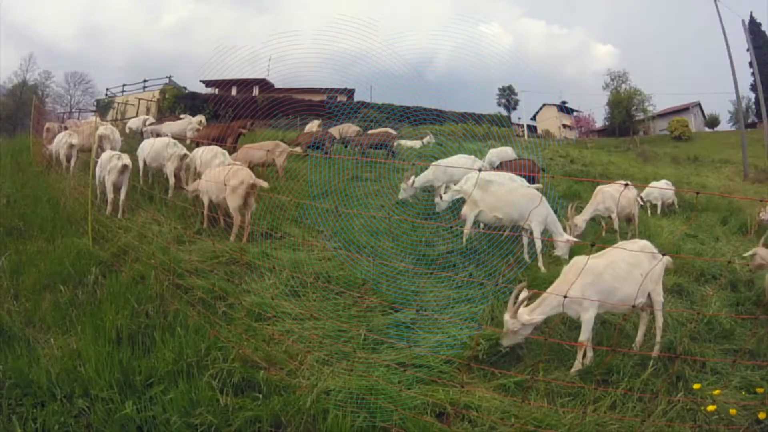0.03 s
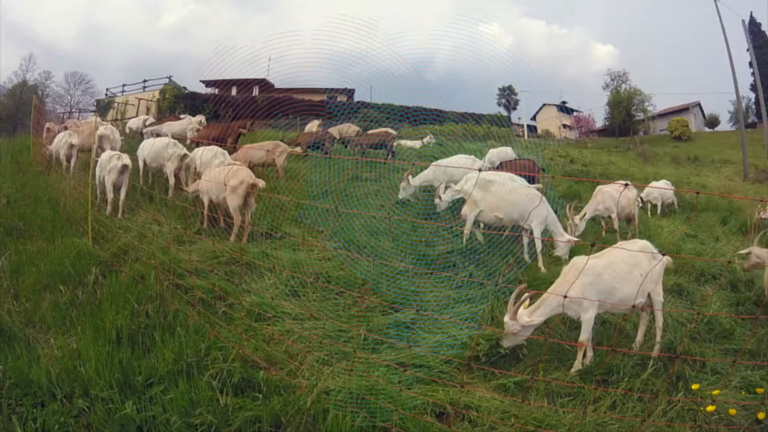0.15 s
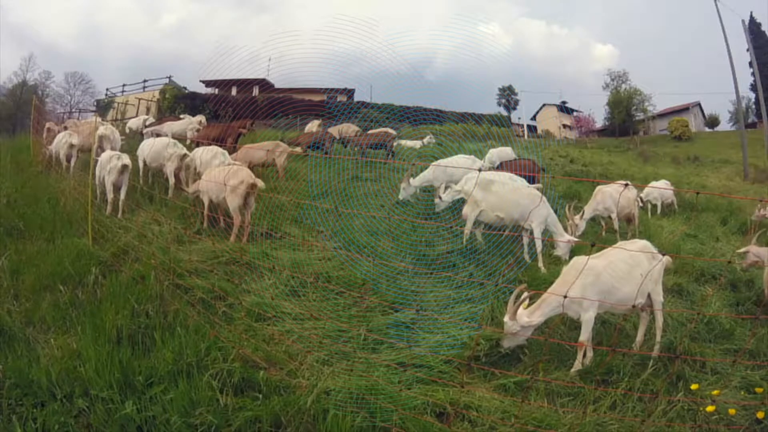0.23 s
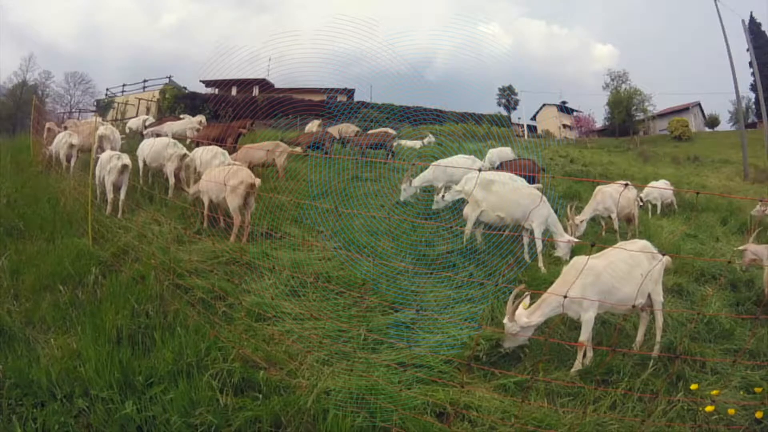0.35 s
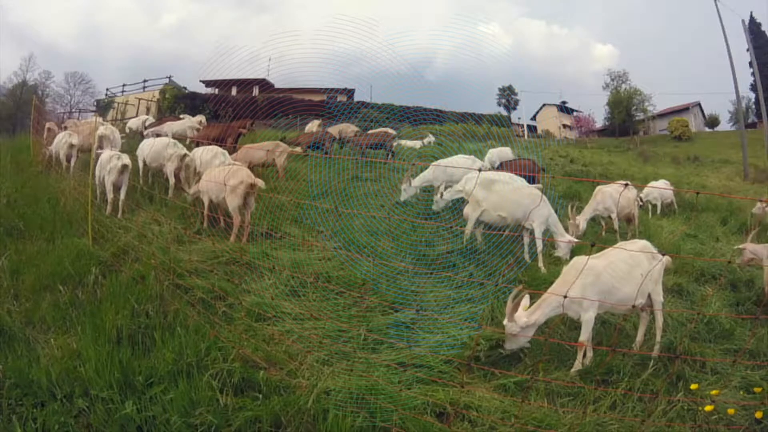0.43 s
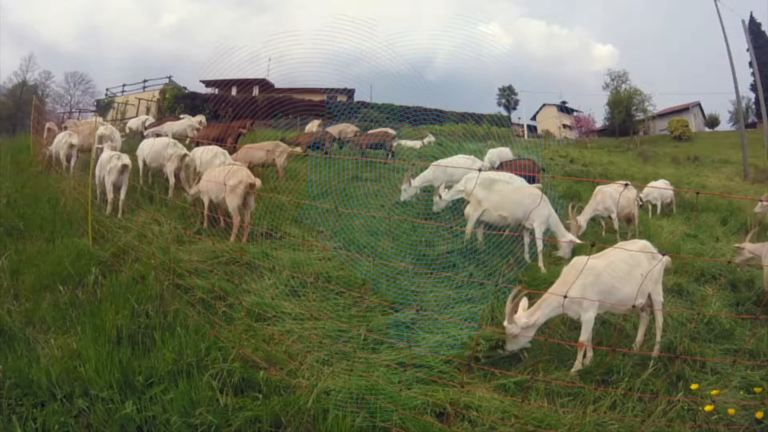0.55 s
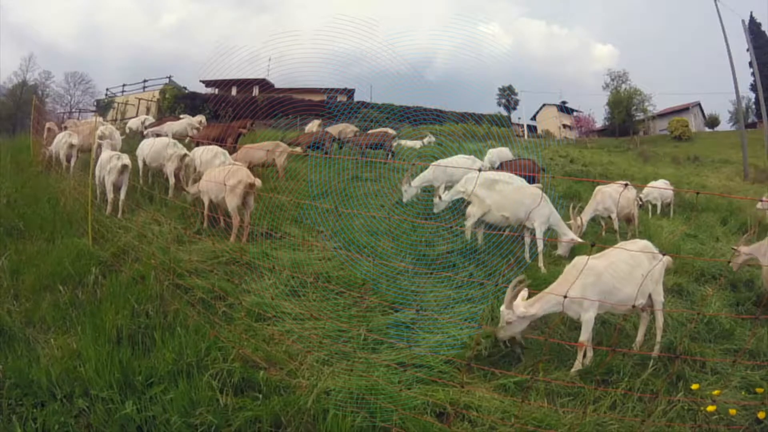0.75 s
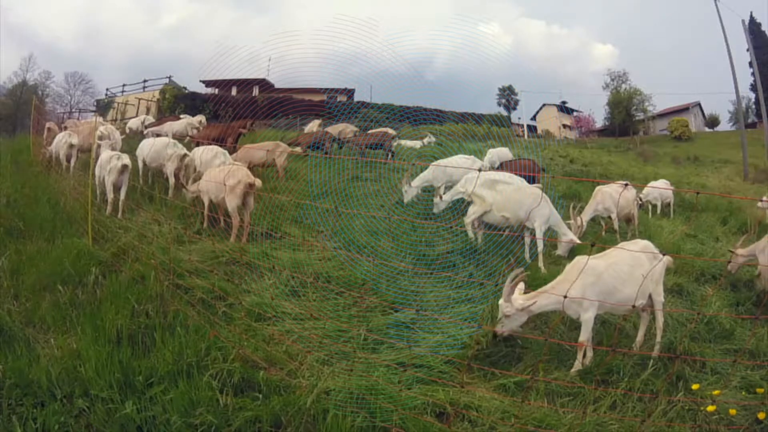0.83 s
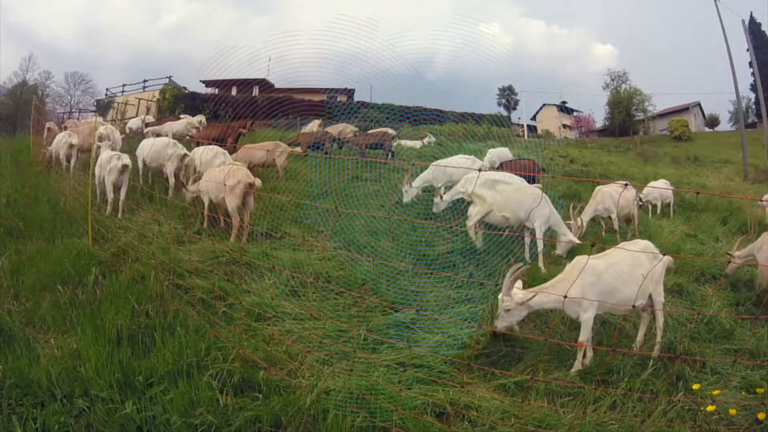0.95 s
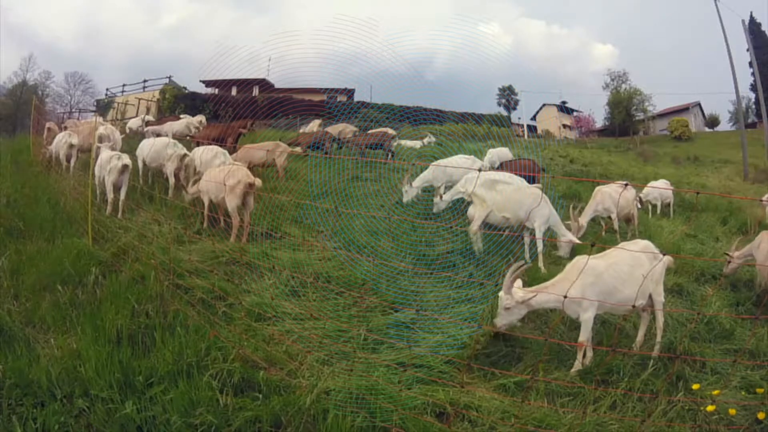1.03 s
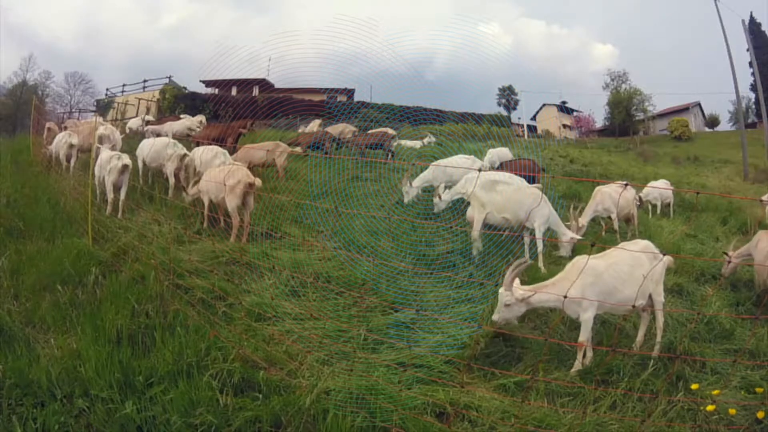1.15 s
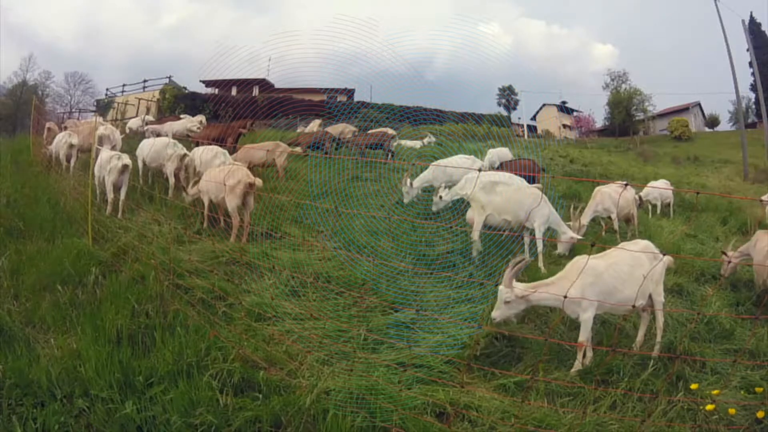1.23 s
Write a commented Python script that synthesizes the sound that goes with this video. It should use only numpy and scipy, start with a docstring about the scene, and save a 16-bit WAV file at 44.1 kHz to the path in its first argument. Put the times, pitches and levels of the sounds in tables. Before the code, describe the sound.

Goat bells clank on an open hillside. Two distant bells ring at the start, left and right. A close sheet-metal bell on the right strikes at about 0.2, 0.4, 0.5, 0.9 and 1.2 seconds, ending with a small clink, while a deeper bell clanks ahead. Hooves thud softly near 0.3 and 0.9 seconds. Faint grass tearing comes and goes over a light rumbling breeze.

```python
"""Goats graze on an open hillside, heard in stereo from within the herd. A light breeze rumbles throughout.
First two far bells clank, a small one on the right and a faint one on the left; grass is torn and a deeper
bell joins from ahead. Then a sheet-metal bell close on the right is struck five times by its clapper,
ringing with its wall modes and a short hollow note of the air inside. Hooves thud softly between the
blows, and after the last one the clapper rebounds with a small clink."""
import sys
import numpy as np
from scipy import signal
from scipy.fft import rfft, irfft
from scipy.io import wavfile

SR = 44100
rng = np.random.default_rng(int(sys.argv[2]) if len(sys.argv) > 2 else 0)


def wav_out(sig):
    """Save sig, one row per channel (or a flat mono array), as 16-bit PCM at SR to the path in sys.argv[1]."""
    wavfile.write(sys.argv[1], SR, np.round(np.clip(np.atleast_2d(sig).T, -1, 1) * 32767).astype(np.int16))


N = 57330
NEAR_LAG_S, AHEAD_LAG_S = 0.00063, -0.000079   # arrival at the left microphone after the right
ATTACK_S, AIR_ATTACK_S = 0.00018, 0.0026   # rise of the metal's ring and of the air note

# Spectrum of a clapper's clack on sheet metal. Each row: frequency in Hz, relative level in dB.
CLACK_SPECTRUM = [(700, -36), (1500, 6), (2900, 3), (4600, 9), (5800, -5.5), (7000, 10.5), (9000, -7.5),
                  (12000, -2), (16000, -19)]


def from_db(db):
    """Decibels to gain."""
    return 10 ** (np.asarray(db) / 20)


def unit_rms(x):
    """Scale to an rms of 1."""
    return x / np.sqrt(np.mean(x ** 2) + 1e-20)


def per_bin(points):
    """Read rows of frequency in Hz and value at every frequency bin."""
    hz, value = np.transpose(points)
    return np.interp(np.log(np.arange(N // 2 + 1) * SR / N + 1), np.log(hz), value)


def coloured(x, spectrum):
    """Shape a signal by a spectrum in dB; rms 1."""
    return unit_rms(irfft(rfft(x) * from_db(per_bin(spectrum)), N))


def butter(x, hz, kind, order=2):
    """Butterworth low- or high-pass."""
    return signal.sosfilt(signal.butter(order, hz, kind, fs=SR, output="sos"), x)


def mic_times(lag_s=0):
    """Time at the left and right microphone; the sound reaches the left lag_s later."""
    return np.arange(N) / SR - np.array([[lag_s], [0]])


def pan(db):
    """Gains that put the left channel db above the right."""
    return from_db([[db], [0]])


def ring_down(t, starts, levels_db, t60, attack_s=ATTACK_S):
    """Envelope of a vibration whose energy is topped up by each strike and then dies away."""
    energy = 0
    for start, db in zip(starts, levels_db):
        age = np.maximum(t - start, 0)
        rise = np.minimum(age / attack_s, 1)
        energy += (from_db(db) * rise * np.exp(-np.log(1000) * age / t60)) ** 2
    return np.sqrt(energy)


def mode(t, hz, starts, levels_db, t60, pan_db, attack_s=ATTACK_S):
    """One struck mode at both microphones."""
    envelope = ring_down(t, starts, levels_db, t60, attack_s)
    return pan(pan_db) * envelope * np.sin(2 * np.pi * (hz * t + rng.random()))


def contact_db(hz, cutoff_hz):
    """A soft contact loses the modes above its cut-off."""
    return -10 * np.log10(1 + (hz / cutoff_hz) ** 8)


def weak_modes(mean_spacing_hz=80):
    """The many faint partials of sheet metal, scattered in pitch, unequal at the two microphones."""
    present = rng.random(N // 2 + 1) < SR / N / mean_spacing_hz
    return coloured(irfft(present * rfft(rng.standard_normal((2, N))), N), CLACK_SPECTRUM)


def breeze(split_hz=420):
    """A low gusting rumble, much alike at both microphones, under a wide faint hiss."""
    # Open air. Each row: frequency in Hz, relative level in dB.
    spectrum = [(35, 1), (70, -2.5), (150, -7), (250, -18.5), (500, -23.5), (1200, -19.5), (3000, -18.5),
                (4600, -17), (8500, -28.5), (12400, -25), (16000, -24.5)]
    # Each row: frequency in Hz, left-right correlation.
    likeness = [(120, 0.92), (300, 0.52), (800, 0.031), (4000, 0.016)]
    # Each row: time in seconds, relative level of the rumble in dB.
    gusts = [(0.0, -69), (0.136, -63), (.2, -62.5), (0.26, -69.5), (0.34, -65), (0.44, -69), (0.6, -60.5),
             (0.66, -69), (0.92, -66), (1.1, -66), (1.22, -70.5)]
    mid, side = rfft(rng.standard_normal((2, N)))
    alike = np.clip(per_bin(likeness), 0, 1)
    noise = irfft(np.sqrt(1 + alike) * mid + np.sqrt(1 - alike) * side * [[1], [-1]], N)
    air = coloured(noise, spectrum)
    swell = from_db(4 + np.interp(mic_times(), *np.transpose(gusts)))
    rumble = swell * pan(2.5) * butter(air, split_hz, "low")
    hiss = from_db(-58) * pan(-2) * butter(air, split_hz, "high")
    return rumble - hiss


def far_bell(modes, strikes, lag_s, air_t60, air_pan_db):
    """A distant bell rings and clacks; its air note shifts as its mouth swings near the goat's neck."""
    t = mic_times(lag_s)
    starts, wall_db, cutoff_hz, air_db, air_hz = np.transpose(strikes)
    ring = sum(mode(t, hz, starts, wall_db + db + contact_db(hz, cutoff_hz), t60, pan_db)
               for hz, db, t60, pan_db in modes)
    hollow = sum(mode(t, hz, [start], [db], air_t60, air_pan_db, AIR_ATTACK_S)
                 for start, db, hz in zip(starts, air_db, air_hz))
    clack_hz = np.mean(CLACK_SPECTRUM, axis=0)[0]
    clack_db = wall_db - 60 + contact_db(clack_hz, cutoff_hz)
    return ring + hollow + pan(4) * weak_modes() * ring_down(t, starts, clack_db, t60=0.22)


def small_bell():
    """Far off on the right, two hard blows ring a small bell."""
    # Each row: wall mode in Hz, level in dB, t60 in seconds, pan in dB.
    modes = [(2678, -51.5, 0.49, -23), (4970, -58, 0.89, -9), (5010, -43, 0.39, -21),
             (7617, -54.5, 0.32, -14), (8070, -60.5, 0.45, -6), (10830, -53.5, 0.38, -16)]
    # Each row: start in seconds, strength in dB, contact cut-off in Hz, air note in dB and in Hz.
    strikes = [(.001, -1, 18300, -62, 1030), (0.364, -7.5, 16100, -64, 1030)]
    return far_bell(modes, strikes, lag_s=0.000242, air_t60=0.13, air_pan_db=-2)


def left_bell():
    """Far off on the left, two soft blows ring a faint bell."""
    # Its one row: wall mode in Hz, level in dB, t60 in seconds, pan in dB.
    modes = [(2627, -60.5, 0.31, 11)]
    # Each row: start in seconds, strength in dB, contact cut-off in Hz, air note in dB and in Hz.
    strikes = [(.001, 2, 3950, -61, 1113), (0.491, -7.5, 3000, -64, 1122)]
    return far_bell(modes, strikes, AHEAD_LAG_S, air_t60=0.5, air_pan_db=3.8)


def hillside_echoes(bells):
    """The slope scatters a little of the bells' sound back to the microphones."""
    scatter = rng.standard_normal((2, N)) * ring_down(mic_times(), [0.0075], [0], t60=0.93)
    return from_db(-22) * signal.fftconvolve(bells[1:], unit_rms(scatter) / np.sqrt(N), axes=1)[:, :N]


def torn_grass(snaps_per_s=4800, spread_db=5):
    """To the right, each pull of a muzzle is a short swell of tiny snapping blades."""
    # Each row: peak time in seconds, length in seconds, level in dB.
    tears = [(.13, .05, -62), (.178, .025, -62), (.352, .025, -62), (.712, .022, -61), (1.12, .018, -64),
             (1.165, .04, -64)]
    # Snapping blades. Each row: frequency in Hz, relative level in dB.
    spectrum = [(1000, -13), (2500, -21), (4500, -2), (9000, -3), (12500, 0), (16000, -10)]
    snapping = rng.random(N) < snaps_per_s / SR
    strength = from_db(spread_db * rng.standard_normal(N).clip(-2, 2))
    snaps = snapping * strength * rng.standard_normal((2, N))
    pull = sum(from_db(db) * np.exp(-2 * ((mic_times() - at) / length) ** 2) for at, length, db in tears)
    return pan(-5.5) * pull * coloured(snaps, spectrum)


def deep_bell():
    """Some way ahead, a deeper bell takes a mix of hard and soft blows."""
    # Each row: wall mode in Hz, level in dB, t60 in seconds, pan in dB.
    modes = [(2174, -70, 0.71, 6.5), (4400, -46.5, 0.2, 1), (4420, -43.5, 0.1, -0.5), (5140, -57, .5, 3),
             (6753, -54, 0.1, 2), (7652, -56, 0.12, 6), (10170, -51.5, 0.14, -1.5), (12780, -47, 0.11, -4),
             (14800, -52, .09, 2.5)]
    # Each row: start in seconds, strength in dB, contact cut-off in Hz, air note in dB and in Hz.
    strikes = [(.168, -3, 15000, -66, 930), (0.208, -20, 1500, -55, 895), (0.575, -2.5, 18400, -52, 890),
               (0.585, 10, 2900, -45.5, 884), (0.775, 5, 1830, -58, 903), (.838, -18, 1800, -64, 894),
               (.94, -0.5, 13000, -56, 933)]
    return far_bell(modes, strikes, AHEAD_LAG_S, air_t60=0.17, air_pan_db=3.9)


def near_bell(node_loss_db=21.5, width_hz=24, choke_s=0.0053):
    """Close on the right: where and how hard the clapper lands decides which wall modes ring."""
    # Pitches of the wall modes in Hz.
    pitches = [1557, 1884, 2691, 2862, 3275, 3967, 4570, 4657, 4718, 5283, 5900, 6013, 6258, 6979, 7106,
               7448, 7630, 8347, 8805, 9598, 9915, 10409, 11540, 12096, 12505, 13215, 13970, 15571]
    # Each row, one per pitch: level in dB when struck on the broad wall, the narrow wall and the rim,
    # t60 in seconds, pan in dB.
    modes = [(-63, -45, -42, 1.23, -2.5), (-46, -61, -60, 0.64, -5), (-29.5, -48, -56, 0.44, -8),
             (-43.5, -49.5, -45, 0.068, -6), (-53, -44, -76, 0.54, -10), (-40.5, -61, -45, 0.15, -19),
             (-66, -63, -64, 0.096, 9), (-31.5, -52, -61, 0.21, -15), (-42, -44.5, -45, 0.094, -12),
             (-32.5, -37.5, -42.5, 0.57, -16.5), (-28, -66, -66, 0.11, -22), (-38, -52, -57, 0.032, -22),
             (-51, -71, -52, 0.09, -18), (-28, -64, -51, 0.19, -29), (-49, -35, -42.5, 0.076, -27),
             (-64, -69, -53, 0.4, -18), (-53.5, -61, -56.5, 0.34, -21), (-43, -66, -54.5, .13, -13),
             (-40, -55, -54, 0.096, -17), (-50, -61, -58, 0.14, -10), (-40.5, -51, -52, 0.1, -9),
             (-41.5, -54, -50, 0.15, -25), (-48, -55, -51, 0.076, -13), (-39.5, -48, -52, 0.11, -19),
             (-43, -58, -56, 0.14, -17), (-49, -75, -68, .08, -30), (-45, -62, -58, 0.13, -17),
             (-43, -68, -56, 0.11, -9.5)]
    # Each row: start in seconds, strength in dB on broad wall, narrow wall and rim, air note in dB,
    # contact cut-off in Hz, clack in dB, mode in Hz whose node is hit. The fourth blow lands twice.
    strikes = [(0.2039, 2.5, -21, -21.5, -26.5, 19000, -44, 5283),
               (.3870, -49, -24, 1, -28, 16000, -48, 3275), (0.52, -24, 5.5, -9, -35.5, 18000, -61, 3967),
               (0.895, -18, -5, -7, -45, 18000, -45, 6979), (0.8972, -5, -36, 1, -46.5, 3670, -39.5, 1557),
               (1.201, -20.5, -13, -7, -35.5, 4100, -49.5, 3967)]
    # The clapper rests against the wall and chokes one mode until the next strike.
    # Each row: start in seconds, mode in Hz, loss in dB.
    chokes = [(0.573, 5283, 12), (0.969, 2691, 11.5)]
    t = mic_times(NEAR_LAG_S)
    starts, broad_db, narrow_db, rim_db, air_db, cutoff_hz, clack_db, node_hz = np.transpose(strikes)
    hollow = mode(t, hz=796, starts=starts, levels_db=air_db, t60=0.24, pan_db=4, attack_s=AIR_ATTACK_S)
    ring = 0
    for hz, (on_broad_db, on_narrow_db, on_rim_db, t60, pan_db) in zip(pitches, modes):
        places = from_db([broad_db + on_broad_db, narrow_db + on_narrow_db, rim_db + on_rim_db])
        struck_db = 20 * np.log10(np.linalg.norm(places, axis=0)) + contact_db(hz, cutoff_hz)
        missed_db = node_loss_db * np.exp(-((hz - node_hz) / width_hz) ** 2)
        choked_db = 0
        for at, choked_hz, loss_db in chokes:
            resting = np.clip((t - at) / choke_s, 0, 1) * (t < starts[starts > at].min())
            choked_db += loss_db * resting * np.exp(-((hz - choked_hz) / width_hz) ** 2)
        ring += from_db(-choked_db) * mode(t, hz, starts, struck_db - missed_db, t60, pan_db)
    clack = weak_modes() * ring_down(t, starts, clack_db, t60=0.16)
    contact_noise = coloured(rng.standard_normal((2, N)), CLACK_SPECTRUM)
    crack = contact_noise * ring_down(t, starts, clack_db + 1.5, t60=0.016)
    return hollow + ring + pan(-10) * (clack + crack)


def hooves():
    """Hooves land on turf with dull thuds, in the centre."""
    # Each row: start in seconds, level in dB, pitch in Hz.
    thuds = [(0.329, -49, 170), (0.926, -44.5, 139.9)]
    return sum(mode(mic_times(), hz, [start], [db], t60=0.052, pan_db=0, attack_s=0.0059)
               for start, db, hz in thuds)


def clapper_clink(start_s=1.2135):
    """The near bell's clapper rebounds with a short, light ring of its own."""
    # Each row: mode in Hz, level in dB, t60 in seconds.
    modes = [(2850, -44, 0.04), (2925, -45, 0.039), (3370, -55, .07), (6060, -55, 0.15), (6800, -52, 0.082)]
    return sum(mode(mic_times(NEAR_LAG_S), hz, [start_s], [db], t60, pan_db=-8) for hz, db, t60 in modes)


def scene():
    """Four bells in the open, radiating almost nothing below their air notes, amid the grazing."""
    metal = deep_bell() + left_bell() + small_bell() + near_bell() + clapper_clink()
    bells = butter(metal, 770, "high", order=6)
    return bells + hillside_echoes(bells) + torn_grass() + hooves() + breeze()


def record(dry):
    """The treble is cut steeply above 15.9 kHz."""
    return signal.sosfilt(signal.ellip(10, .1, 70, 15900, fs=SR, output="sos"), dry)


dry = scene()
out = record(dry)
wav_out(out)
```